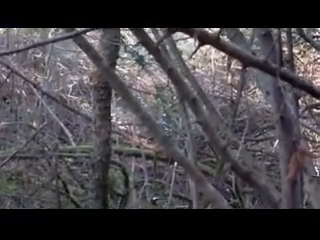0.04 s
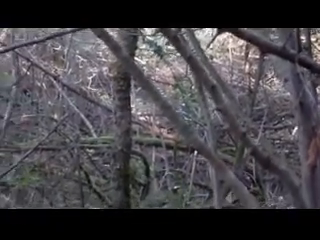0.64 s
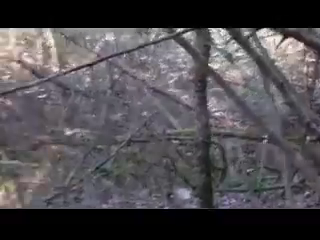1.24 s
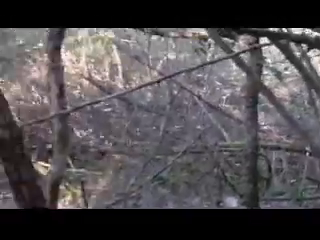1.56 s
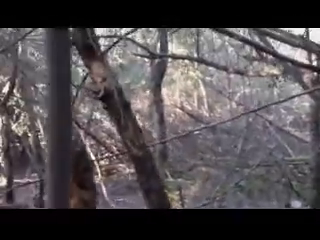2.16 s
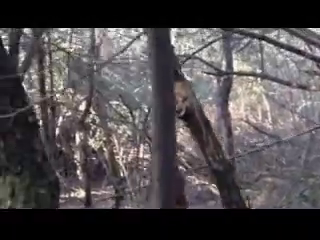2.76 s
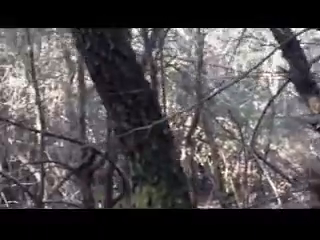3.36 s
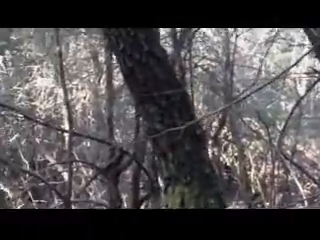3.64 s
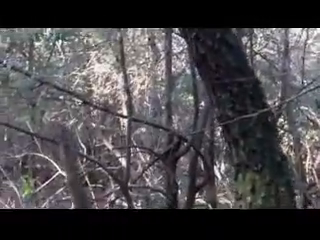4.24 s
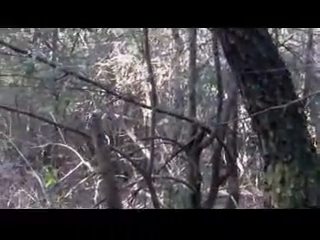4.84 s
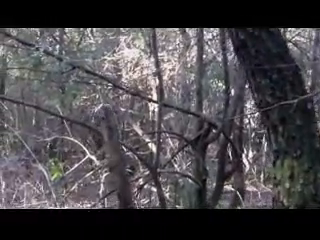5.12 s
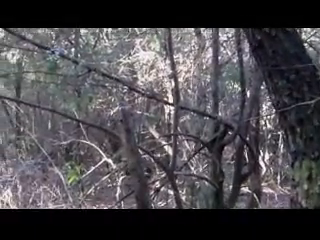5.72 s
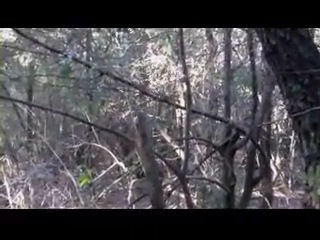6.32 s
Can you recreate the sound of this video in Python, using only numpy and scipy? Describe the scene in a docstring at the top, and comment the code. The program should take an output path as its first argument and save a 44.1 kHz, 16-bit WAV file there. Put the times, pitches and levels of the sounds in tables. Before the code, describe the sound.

A faint steady hush fills a wood. A deep hound gives short arched barks at about 0.4, 1.0, 1.5 and 1.8 seconds, each with a brief echo off the trunks. Close to the microphone, feet shift softly in dry leaves throughout, with faint dull boot thuds. Twigs snap in a cluster between 1.2 and 1.8 seconds, then singly near 2.6 and 3.5.

A higher hound enters with faint yips around 1.8 seconds and a small bark at 2.3, then a loud yip and hoarse bark at 2.7. From 3 seconds it calls almost continuously, about two rounds a second, each a quick yip, a rough bark and a thin, wavering, rising squeal. It is loudest from about 2.7 to 4.8 seconds and then gradually weakens, still calling at 6.5. The deep hound barks again near 3.9, 4.3, 4.6, 5.4 and 6.3 seconds, sounding duller toward the end.

```python
"""Two hounds baying in a winter wood.

The deep hound gives short arched barks: fold pulses and breath ring its throat and mouth. The high
hound joins, breaking from a yip into a hoarse bark, then a rising squeal; in yips and squeals only
the fold edges vibrate. Trunks scatter every call. Close by, feet shift in dry leaves and snap twigs."""
import sys
import numpy as np
from scipy import signal
from scipy.fft import rfft, irfft
from scipy.io import wavfile

SR = 44100
rng = np.random.default_rng(int(sys.argv[2]) if len(sys.argv) > 2 else 0)


def wav_record(signal):
    """Record a signal, one row per channel, as 16-bit PCM in the file named by sys.argv[1]."""
    frames = np.transpose(np.atleast_2d(signal))
    bounded = np.clip(frames, -1, 1)
    # unit amplitude maps onto the largest positive 16-bit level
    quanta = np.round(bounded * 32767).astype(np.int16)
    wavfile.write(sys.argv[1], SR, quanta)


N = 290161
TIME_S = np.arange(N) / SR
LEAD_S = 1  # calls may start before time zero

# Spectra of still air, leaf crackle and foot scuff. Each row: frequency in Hz, gain in dB.
AIR_SPECTRUM = [(20,-25),(100,-13.5),(300,-10.5),(900,10.5),(1500,8),(3000,-15.5),(6000,-24),(11000,-21.5)]
LEAF_SPECTRUM = [(100,-22),(300,-15.5),(700,-4),(1800,2),(3000,0.5),(5000,-0.5),(8000,-0.5),(10500,-5.5),(12500,-23)]
SCUFF_SPECTRUM = [(30,-34.5),(110,-17.5),(200,-7),(350,1),(480,2),(700,-2),(2000,-33)]
# Stereo likeness of the noises. Each row: frequency in Hz, left-right correlation.
STEREO_COHERENCE = [(30,.4),(200,0.97),(1500,1),(3000,0.9),(6000,0.69),(11000,0.53)]
# Envelopes of leaf rustle and foot scuff. Each row: time in seconds, relative level in dB.
RUSTLE_ENVELOPE = [(0, -62), (.6, -63), (.88, -65), (1.05, -61.5), (1.36, -64.5), (1.76, -48), (2.2, -51.5),
                   (2.45, -56.5), (2.88, -57), (3.3, -50), (3.6, -51.5), (4.3, -56), (4.8, -58),
                   (5.35, -63.5), (5.75, -58), (6.25, -62.5), (6.58, -54)]
SCUFF_ENVELOPE = [(0,-72.5),(.9,-64),(2.4,-61),(2.9,-68),(6.58,-72.5)]
# Foot swishes. Each row: centre in seconds, half width in seconds, relative level in dB.
LEAF_SWISHES = [(0.057, 0.03, -57), (0.322, 0.028, -63), (0.479, 0.049, -50), (0.678, 0.0088, -64),
                (2.991, 0.011, -57), (3.972, 0.033, -50.5)]
# Boot thuds. Each row: peak time in seconds, relative level in dB.
BOOT_THUDS = [(0.031, -54), (1.365, -61), (1.68, -61), (3.576, -62), (4.808, -68.5), (4.95, -61.5),
              (5.579, -53.5), (5.974, -61), (6.418, -59)]
# Twig snaps. Each row: start in seconds, relative level in dB, ring in Hz.
TWIG_SNAPS = [(0.192, -44, 1460), (1.2198, -32, 2620), (1.243, -28.5, 1700), (1.2877, -39, 1370),
              (1.389, -33.5, 3100), (1.542, -33, 3000), (1.5607, -39, 3000), (1.6724, -31.5, 2170),
              (1.698, -27.5, 1645), (1.7708, -33.5, 1730), (1.7906, -29.5, 2110), (2.5626, -33.5, 1250),
              (2.974, -43, 1510), (3.479, -26.5, 1610), (4.8187, -40.5, 1790)]
# First echoes off trunks. Each row: delay in seconds, signed gain.
TRUNK_ECHOES = [(.0113,0.11),(0.0251,-0.11),(.038,0.14),(.057,-.12),(.083,0.16)]
# Ring of the wood. Each row: frequency in Hz, T60 in seconds.
WOOD_DECAY = [(300,0.19),(750,0.93),(1000,0.66),(1500,0.68),(3500,0.53),(9000,0.34)]
# Vocal tract of each hound; muzzle of the thin voice. Each row: frequency in Hz, gain in dB.
DEEP_TRACT = [(100, -57.5), (400, -31), (600, 0), (760, 3.5), (1000, 6.5), (1250, 0.5), (1550, 5.5),
              (2250, -3.5), (2900, -20.5), (4200, -28), (5300, -12.5), (6400, -24.5), (11000, -52.5)]
HIGH_TRACT = [(150,-72),(520,-44),(700,-15),(880,1),(1050,4.5),(1500,2.5),(1850,4),(2250,-1),(2550,-13),(2900,-21),(3500,-22),(5200,-22.5),(7000,-27),(11000,-66)]
MUZZLE_RESPONSE = [(2400, 4), (2800, -3), (3300, -3.5), (4100, -2.5), (5000, 6.5), (6200, 9.5),
                   (7200, -4.5)]
# Overtones of the thin voice. Each row: harmonic number, relative level in dB.
THIN_OVERTONES = [(2, 3.5), (3, -16.5), (4, -21.5)]
# Deep hound's barks, duller as it turns away. Each row: start in seconds, length in seconds,
# pitch turning point as a fraction of length, start, turning and end pitch in Hz,
# fundamental and overtone levels in dB, mouth resonance in Hz, treble tilt in dB per octave.
DEEP_HOUND_BARKS = [ (0.394, .138, 0.57, 338.2, 507, 344, -34, -27, 1030, -6),
                    (0.988, 0.13, 0.54, 317, 500, 352, -34.5, -27, 1170, 1),
                    (1.451, .125, 0.48, 475, 523, 389.3, -32, -25.5, 1294, -1.5),
                    (1.821, .135, .65, 515, 604.5, 597, -38.5, -30.5, 1470, -2.5),
                    (3.909, 0.12, .32, 471.7, 564, 350, -41, -18, 1114, -2.5),
                    (4.333, 0.098, .35, 492.6, 572, 392, -40.5, -21, 1357, -5.5),
                    (4.649, 0.092, 0.515, 521, 552.7, 491, -36, -28, 1105, -2.5),
                    (5.399, 0.083, 0.66, 433, 381, 417, -78.5, -29, 835, -21),
                    (6.307, 0.1, 0.21, 502, 577, 445, -42, -31, 1000, -9.5), ]
# High hound's yips. Each row: start in seconds, length in seconds, start and end pitch in Hz,
# start, end and overtone levels in dB.
HIGH_HOUND_YIPS = [ (1.821, 0.051, 1534, 1243, -34.5, -32, -59), (1.906, .09, 994, 872, -34.5, -35.5, -52),
                   (2.744, 0.044, 1674, 1563, -29.5, -9, -40),
                   (3.075, 0.037, 1164, 1264, -16, -23.5, -49.5),
                   (3.572, .028, 1279, 1266, -19.5, -14.5, -45), (4.025, 0.025, 1286, 1300, -22, -16, -51),
                   (4.472, 0.035, 1295, 1238, -26, -21, -39), (4.96, 0.037, 1125, 1259, -28.5, -34, -45.5),
                   (5.472, 0.039, 1094, 1290, -31, -30.5, -43), (5.972, 0.047, 1232, 1335, -48, -26, -45),
                   (6.446, 0.048, 1192, 1233, -38.5, -29, -52.5), ]
# Its hoarse barks. Each row: start in seconds, length in seconds, start and end pitch in Hz, relative
# fundamental and overtone levels in dB, level ramp in dB, mid-bark mouth resonance in Hz, crack in dB.
HIGH_HOUND_BARKS = [ (2.327, 0.055, 756, 695.6, -38, -31, 8.5, 1100, 7),
                    (2.786, 0.11, 792, 702.8, -21, -21, -7, 1080, 2),
                    (3.096, 0.11, 701.7, 741, -20, -16, 1.5, 1430, -5),
                    (3.594, 0.099, 712.5, 769.7, -23.5, -16, 2, 1440, -5),
                    (4.045, 0.12, 748.4, 786.7, -21, -19, -4.5, 1510, 3),
                    (4.494, 0.123, 696.3, 756, -26.5, -24, -1, 1890, 4),
                    (4.986, 0.11, 665, 747.6, -29, -25.5, -6.5, 1350, 11),
                    (5.496, .165, 657.4, 763, -40, -27.5, 3, 1710, -4),
                    (5.716, 0.11, 798, 786.5, -32.5, -30.5, 3, 1670, -24),
                    (5.961, 0.16, 694.2, 757.4, -36.5, -26, 7, 1520, -8),
                    (6.47, 0.13, 643, 690, -34.5, -32, 6, 1600, 3), ]
# Its squeals. Each row: start, length and scoop time in seconds, start, scooped and end pitch in Hz,
# body level in dB, crest delay in seconds, crest level in dB, relative rasp in dB at 1600 Hz.
HIGH_HOUND_SQUEALS = [ (3.176, 0.098, 0.024, 1065, 1178, 1486, -30.5, 0.012, -15, -18),
                      (3.281, 0.14, 0.024, 1516, 1635, 1574, -23.5, 0.052, -11.5, -24),
                      (3.654, 0.12, 0.047, 1038, 1493, 1675, -22.5, .075, -16, -14.5),
                      (3.78, 0.14, 0.082, 1671, 1808, 1893, -21.5, 0.042, -11, -25.5),
                      (4.13, .195, 0.018, 1115, 1389, 1717, -23.5, 0.037, -16, -16),
                      (4.575, 0.19, .06, 1011, 1465, 1827, -21.5, 0.16, -15, -17),
                      (5.09, 0.11, .055, 1350, 1667, 1738, -24.5, 0.11, -21.5, -11.5),
                      (5.209, 0.13, 0.068, 1711, 1756, 1795, -22.5, 0.014, -17.5, -16.5),
                      (5.654, 0.24, 0.062, 1552, 1676, 1547, -31.5, 0.084, -24, -10),
                      (6.152, 0.21, 0.073, 1610, 1666, 1570, -34, 0.082, -26, -14.5), ]


def gain_of(db):
    """Decibels to amplitude."""
    return 10 ** (np.asarray(db) / 20)


def unit_rms(x):
    """Scales to rms 1."""
    return x / np.sqrt(np.mean(x ** 2) + 1e-20)


def lookup(points, hz):
    """Interpolates on a log-frequency axis."""
    knots_hz, values = np.transpose(points)
    return np.interp(np.log(hz + 1), np.log(knots_hz + 1), values)


def colour(x, spectrum):
    """Filters by a spectrum in dB."""
    size = 2 * x.shape[-1]
    response = gain_of(lookup(spectrum, np.fft.rfftfreq(size, 1 / SR)))
    return irfft(rfft(x, size) * response, size)[..., :size // 2]


def resonate(x, hz, width_hz):
    """Resonator tracking the curve hz."""
    carrier = np.exp(2j * np.pi * np.cumsum(hz) / SR)
    pole = np.exp(-np.pi * width_hz / SR)
    return 2 * (carrier * signal.lfilter([1 - pole], [1, -pole], x / carrier)).real


def add(mix, start_s, sound):
    """Mixes a sound in place."""
    part = mix[max(round(start_s * SR), 0):][:len(sound)]
    part += sound[:len(part)]


def wander(size, cutoff_hz):
    """Low-passed noise, rms about 1."""
    hz = np.fft.rfftfreq(SR, 1 / SR)
    return unit_rms(irfft(rfft(rng.standard_normal(SR)) / (1 + (hz / cutoff_hz) ** 4)))[:size]


def stereo(a, b):
    """Two independent signals to a partly coherent pair."""
    coherence = np.clip(lookup(STEREO_COHERENCE, np.fft.rfftfreq(N, 1 / SR)), -1, 1)
    mid = rfft(a) * np.sqrt((1 + coherence) / 2)
    side = rfft(b) * np.sqrt((1 - coherence) / 2)
    return irfft(np.array([mid + side, mid - side]), N)


def call_time(length_s):
    """Time t in seconds and progress u, 0 to 1."""
    t = np.arange(0, length_s, 1 / SR)
    return t, t / length_s


def bell(x, centre, half_width):
    """Gaussian of height 1."""
    return np.exp(-((x - centre) / half_width) ** 2)


def gate(size, fade_s):
    """Fades in over fade_s, out over twice that."""
    t = np.arange(size) / SR
    return np.sin(np.pi / 2 * np.clip(np.minimum(t, (t[-1] - t) / 2) / fade_s, 0, 1)) ** 2


def air(level_db=-60):
    """Faint steady hush of the wood."""
    return gain_of(level_db) * unit_rms(stereo(*colour(rng.standard_normal((2, N)), AIR_SPECTRUM)))


def thuds(gain_db=-3, band_hz=(150, 330), rise_s=0.011):
    """Dull pushes of a boot on soft ground."""
    out, t = np.zeros(N), np.arange(SR // 8) / SR
    band = signal.butter(2, band_hz, "band", fs=SR, output="sos")
    envelope = t / rise_s * np.exp(1 - t / rise_s)
    for peak_s, db in BOOT_THUDS:
        push = unit_rms(signal.sosfilt(band, rng.standard_normal(len(t))))
        add(out, peak_s - rise_s, gain_of(gain_db + db) * push * envelope)
    return out


def leaves(gain_db=4, spread_db=2, cracks_per_s=1800, wash=0.97, clump_db=1.6, scuff_swell_db=5):
    """Tiny cracks of dry leaves, in clumps, over the low scuff of shifting feet."""
    cracks = rng.choice([-1, 1], (2, N)) * (rng.random((2, N)) < cracks_per_s / SR)
    cracks = cracks * gain_of(spread_db * np.minimum(rng.exponential(1, (2, N)), 4))
    crackle = colour(unit_rms(cracks) + wash * rng.standard_normal((2, N)), LEAF_SPECTRUM)
    knots = N // 1600
    clumps = np.interp(TIME_S, np.linspace(0, TIME_S[-1], knots), rng.standard_normal(knots))
    scuff = unit_rms(colour(rng.standard_normal(N), SCUFF_SPECTRUM))
    scuff *= gain_of(np.interp(TIME_S, *np.transpose(SCUFF_ENVELOPE)) + scuff_swell_db * clumps)
    motion = gain_of(np.interp(TIME_S, *np.transpose(RUSTLE_ENVELOPE)))
    motion += sum(gain_of(db) * bell(TIME_S, at_s, half_s) for at_s, half_s, db in LEAF_SWISHES)
    return unit_rms(stereo(*crackle)) * motion * gain_of(gain_db + clump_db * clumps) + scuff


def twigs(gain_db=-4, crack_t60_s=0.014, settle_db=-9, settle_t60_s=0.24):
    """A sharp crack rings the stick; leaves settle briefly."""
    out, t = np.zeros((2, N)), np.arange(SR // 10) / SR
    envelope = gain_of(-60 * t / crack_t60_s) + gain_of(settle_db - 60 * t / settle_t60_s)
    for start_s, db, ring_hz in TWIG_SNAPS:
        for channel in out:
            burst = colour(rng.standard_normal(len(t)), LEAF_SPECTRUM)
            stick = signal.lfilter(*signal.iirpeak(ring_hz, Q=3, fs=SR), burst)
            snap = unit_rms(unit_rms(burst) + unit_rms(stick))
            add(channel, start_s, gain_of(gain_db + db) * envelope * snap)
    return stereo(*out)


def wood(calls, thicket_db=-14, thicket_t60_s=0.16, ring_db=-13, side_db=-19, echoes_per_s=1500):
    """Direct sound, trunk echoes, quick thicket scatter and a long faint ring."""
    size = SR * 3 // 2
    taps = rng.standard_normal((2, size)) * (rng.random((2, size)) < echoes_per_s / SR)
    taps *= np.arange(size) > .008 * SR
    hz, t, spectra = signal.stft(taps, SR, nperseg=256)
    echo = 0
    for db, t60_s in ((thicket_db, thicket_t60_s), (ring_db, lookup(WOOD_DECAY, hz)[:, None])):
        tail = signal.istft(spectra * gain_of(-60 * t / t60_s), SR, nperseg=256)[1]
        echo = echo + gain_of(db) * tail / np.linalg.norm(tail[0])
    # Close microphone ports differ by the wave's slope: treble is wider than bass.
    mid, side = echo[0], gain_of(side_db) * np.gradient(echo[1]) * SR / (2 * np.pi * 500)
    mid[0] += 1
    for delay_s, gain in TRUNK_ECHOES:
        mid[round(delay_s * SR)] += gain
    heard = signal.fftconvolve(calls[None], np.array([mid + side, mid - side]), axes=1)
    return heard[:, LEAD_S * SR:][:, :N]


def full_voice(hz, low_db, upper_db, mouth_hz, rough, tract, mouth_db, mouth_width_hz, fade_s):
    """Uneven fold pulses and air puffs ring the throat and a moving mouth resonance."""
    size = len(hz)
    jitter = .04 * np.sqrt(rough)
    cycles = np.cumsum(hz * (1 + jitter * wander(size, 160))) / SR
    # Alternating strong and weak pulses add lines halfway between harmonics.
    multiples = np.arange(3, 37)[:, None] / 2
    gains = np.where(multiples % 1, 2 * rough * abs(1 + wander(size, 46) / 2), 1)
    boost_db = mouth_db / (1 + ((multiples * hz - mouth_hz) / mouth_width_hz) ** 2)
    gains *= gain_of(lookup(tract, multiples * hz) + boost_db)
    phases = 2 * np.pi * (multiples * cycles + rng.random(multiples.shape))
    overtones = (gains * np.cos(phases)).sum(0) / np.sqrt((gains ** 2).sum(0) / 2)
    airflow = .5 + np.exp(-(cycles % 1) / 0.04)
    puffs = colour(airflow * rng.standard_normal(size), tract)
    puffs = unit_rms(puffs + resonate(puffs, mouth_hz, mouth_width_hz))
    upper = np.sqrt(1 - rough) * overtones + np.sqrt(rough) * puffs
    fundamental = np.sqrt(2) * np.cos(2 * np.pi * cycles) * (1 + rough * wander(size, 70))
    shimmer_db = 2 * wander(size, 45)
    voice = gain_of(low_db) * fundamental + gain_of(upper_db) * upper
    return gate(size, fade_s) * gain_of(shimmer_db) * voice


def thin_voice(hz, db, overtone_db, rasp_db, rasp_db_per_octave=-8, jitter=.011, shimmer=.2):
    """Only the fold edges vibrate: a shaky tone whose rasp clears as pitch climbs."""
    size = len(hz)
    phase = 2 * np.pi * np.cumsum(hz * (1 + jitter * wander(size, 200))) / SR
    tone = np.sqrt(2) * np.cos(phase) * np.exp(shimmer * wander(size, 37))
    overtones = sum(gain_of(level_db) * np.sqrt(2) * np.cos(k * phase) * (1 + wander(size, 65) / 2)
                    for k, level_db in THIN_OVERTONES)
    overtones = colour(overtones, MUZZLE_RESPONSE)
    breath = colour(rng.standard_normal(size), HIGH_TRACT)
    rasp = unit_rms(resonate(breath, hz, width_hz=500))
    rasp *= gain_of(rasp_db + rasp_db_per_octave * np.log2(hz / 1600))
    return gate(size, fade_s=.0022) * (gain_of(db) * (tone + rasp) + gain_of(overtone_db) * overtones)


def deep_bark(length_s, turn_at, start_hz, turn_hz, end_hz, low_db, upper_db, mouth_hz, tilt_db_per_oct,
              loudest_at=.48, arch_power=1.7, mouth_fall=.3, shadow_hz=1460):
    """Pitch and effort arch while the mouth closes; the slack ends are roughest."""
    _, u = call_time(length_s)
    arch = np.interp(u, [0, turn_at, 1], [1, 0, 1]) ** arch_power
    hz = turn_hz + (np.where(u < turn_at, start_hz, end_hz) - turn_hz) * arch
    slack = np.interp(u, [0, loudest_at, 1], [1, 0, 1]) ** 2
    low_db = low_db + np.where(u < loudest_at, -14, -11) * slack
    upper_db = upper_db + np.where(u < loudest_at, -15, -13.5) * slack
    mouth_hz = mouth_hz * (1 - mouth_fall * (u - .5))
    # The head shades only the treble.
    tract = [(f, db + tilt_db_per_oct * max(np.log2(f / shadow_hz), 0)) for f, db in DEEP_TRACT]
    return full_voice(hz, low_db, upper_db, mouth_hz, rough=.09 + .15 * slack, tract=tract,
                      mouth_db=9, mouth_width_hz=70, fade_s=0.0034)


def yip(length_s, start_hz, end_hz, start_db, end_db, overtone_db):
    """Short slide of the thin voice before it breaks."""
    _, u = call_time(length_s)
    hz = start_hz + (end_hz - start_hz) * u
    db = start_db + (end_db - start_db) * u
    return thin_voice(hz, db, overtone_db, rasp_db=-23)


def high_bark(length_s, start_hz, end_hz, low_db, upper_db, ramp_db, clear_mouth_hz, crack_db,
              break_mouth_hz=1140, clear_db=3, low_fall_db=8.5):
    """The voice drops into full register, sags, clears briefly and cracks again."""
    t, u = call_time(length_s)
    clear = bell(u, .54, .22)
    sag = 1 - .02 * bell(u, .25, .2)
    waver = 1 + .009 * wander(len(t), 40)
    hz = (start_hz + (end_hz - start_hz) * u) * sag * waver
    effort_db = ramp_db * (u - .5) + crack_db * bell(u, .96, .22)
    low_db = low_db + effort_db - low_fall_db * (u - .5)
    upper_db = upper_db + effort_db + clear_db * clear
    mouth_hz = break_mouth_hz + (clear_mouth_hz - break_mouth_hz) * clear
    return full_voice(hz, low_db, upper_db, mouth_hz, rough=.38 - .33 * clear, tract=HIGH_TRACT,
                      mouth_db=16, mouth_width_hz=560, fade_s=0.0069)


def squeal(length_s, scoop_s, start_hz, scooped_hz, end_hz, body_db, crest_s, crest_db, rasp_db,
           attack_db=-8, release_db=-7.5, waver_hz=26, waver_db=1.9):
    """The thin voice scoops up, wavers, swells and fades as breath runs out."""
    t, _ = call_time(length_s)
    hz = np.interp(t, [0, scoop_s, length_s], [start_hz, scooped_hz, end_hz])
    hz *= 1 + .008 * wander(len(t), waver_hz)
    db = body_db + (crest_db - body_db) * bell(t, crest_s, .036)
    db += attack_db * bell(t, 0, .013) + release_db * bell(t, length_s, .019)
    # Overtones partly follow the swell and weaken at low pitch.
    octaves_below = np.maximum(np.log2(1620 / hz), 0)
    overtone_db = -48 + .73 * (db + 20) - 21.5 * octaves_below
    db += waver_db * wander(len(t), waver_hz)
    overtone_db += waver_db * wander(len(t), waver_hz)
    return thin_voice(hz, db, overtone_db, rasp_db)


def hounds(high_bark_db=-2, early_bark_s=-0.24, early_bark_db=-5):
    """Both dogs, call by call, from LEAD_S before time zero."""
    out = np.zeros(N + LEAD_S * SR)
    small_chest = signal.butter(5, 570, "high", fs=SR, output="sos")  # radiates no bass
    for start_s, *row in HIGH_HOUND_YIPS:
        add(out, LEAD_S + start_s, yip(*row))
    for start_s, *row in HIGH_HOUND_BARKS:
        add(out, LEAD_S + start_s, gain_of(high_bark_db) * signal.sosfilt(small_chest, high_bark(*row)))
    for start_s, *row in HIGH_HOUND_SQUEALS:
        add(out, LEAD_S + start_s, squeal(*row))
    for start_s, *row in DEEP_HOUND_BARKS:
        add(out, LEAD_S + start_s, deep_bark(*row))
    # Only this bark's echo is heard, as the scene opens.
    add(out, LEAD_S + early_bark_s, gain_of(early_bark_db) * deep_bark(*DEEP_HOUND_BARKS[0][1:]))
    return signal.sosfilt(signal.butter(3, 230, "high", fs=SR, output="sos"), out)


def scene():
    """Hounds among the trees, small noises close by."""
    return wood(hounds()) + leaves() + twigs() + thuds() + air()


def record(dry, notch_hz=7800, notch_width_hz=220, notch_db=-10, left_lag_samples=0.79, cutoff_hz=12400):
    """Two close microphone ports: narrow notch, left delay, band limit."""
    hz = np.fft.rfftfreq(N, 1 / SR)
    spectrum = rfft(dry) * gain_of(notch_db * bell(hz, notch_hz, notch_width_hz))
    spectrum[0] *= np.exp(-2j * np.pi * hz * left_lag_samples / SR)
    low_pass = signal.firwin(129, cutoff_hz, window=("kaiser", 9), fs=SR)
    return signal.oaconvolve(irfft(spectrum, N), low_pass[None], "same", axes=1)


dry = scene()
out = record(dry)
wav_record(out)
```